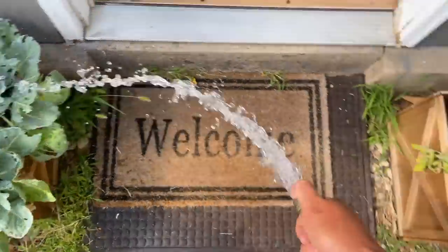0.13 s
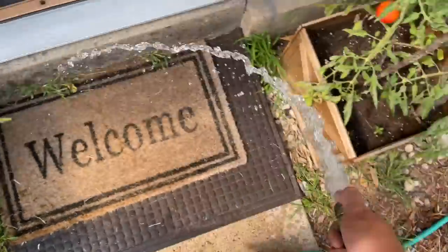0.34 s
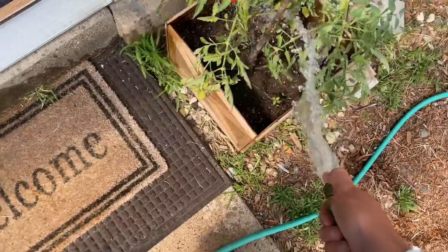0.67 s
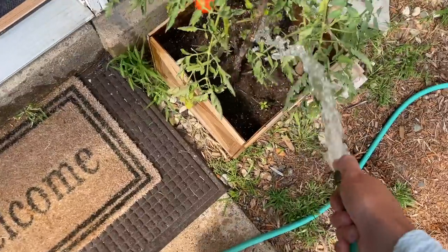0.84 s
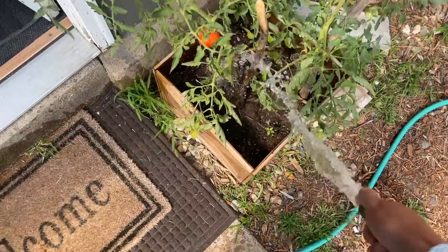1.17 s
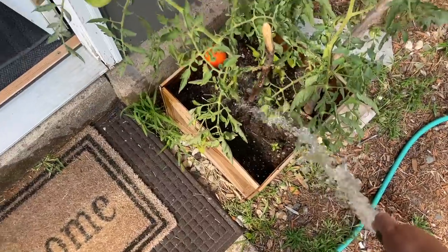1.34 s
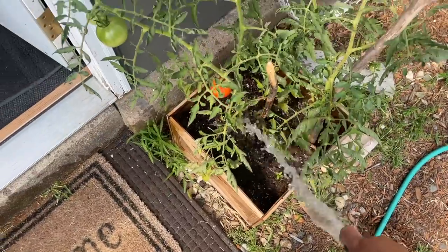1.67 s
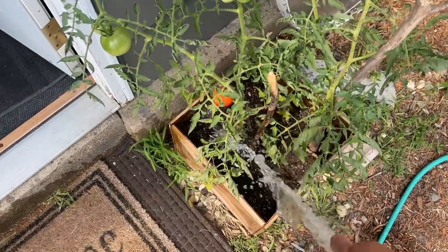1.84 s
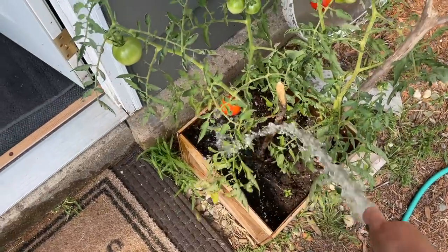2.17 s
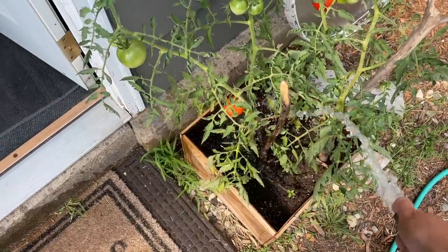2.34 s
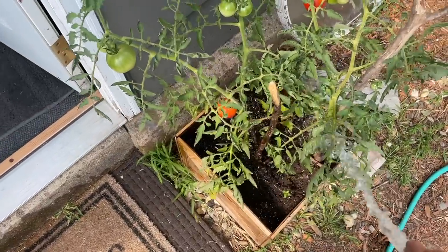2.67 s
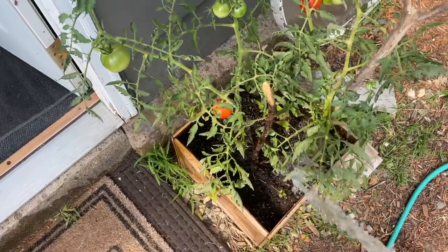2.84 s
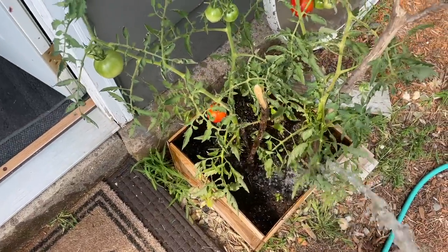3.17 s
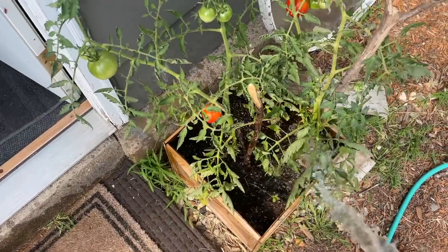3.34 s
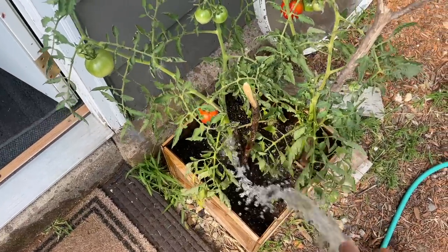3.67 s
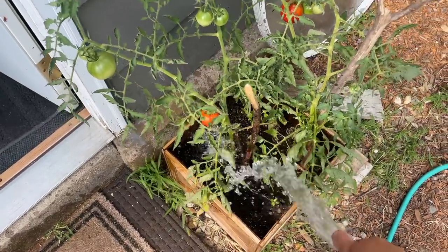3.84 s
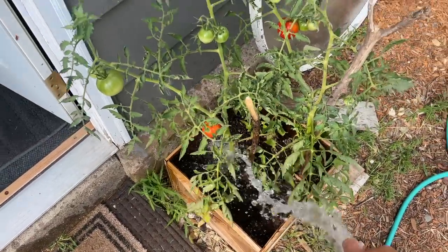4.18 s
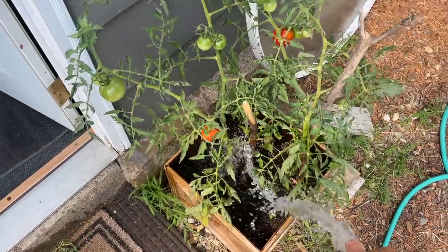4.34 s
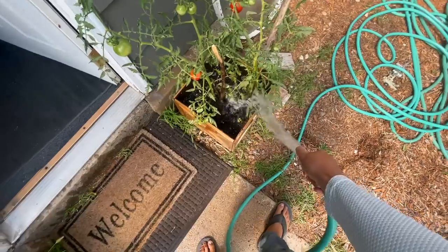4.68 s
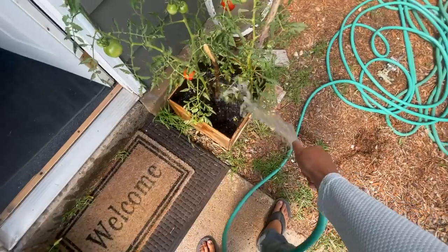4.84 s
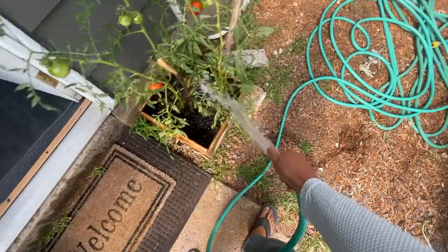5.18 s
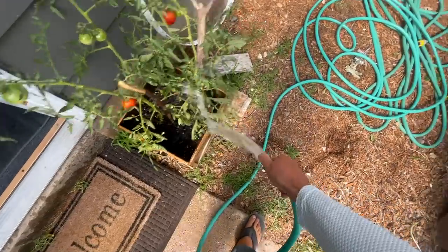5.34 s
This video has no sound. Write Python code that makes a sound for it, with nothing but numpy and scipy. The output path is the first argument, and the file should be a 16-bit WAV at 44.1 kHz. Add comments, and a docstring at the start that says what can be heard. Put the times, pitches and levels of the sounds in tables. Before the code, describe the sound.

Close, crackly water from a garden hose splashes on plants and soil, wooden box thumping underneath, then turning thinner and brighter near the end.

```python
"""A loose jet from a garden hose is swung over a wooden planter beside a house wall.
Its water patters and fizzes as random drops: short noise bursts, ringing cavities and trapped bubbles.
Larger slugs splat as noise around a rising tone, and the heavy ones thud on the soil.
Random hits drum the planter and stir a low rumble, over the steady shaped noise of the yard.
A hand-held pair of microphone ports hears it; near the end it is raised and turned."""
import sys
import numpy as np
from scipy import signal
from scipy.fft import rfft, irfft
from scipy.io import wavfile
from scipy.ndimage import uniform_filter1d

SR = 44100
rng = np.random.default_rng(int(sys.argv[2]) if len(sys.argv) > 2 else 0)


def unload_wav(signal):
    """Save mono or channel-first audio to the path in sys.argv[1] as 16-bit WAV at rate SR, clipped to [-1, 1]."""
    wavfile.write(
        sys.argv[1],
        SR,
        np.round(np.clip(np.atleast_2d(signal).T, -1, 1) * 32767).astype(np.int16),
    )


N = 242991


def from_db(db):
    """Turn decibels into a gain."""
    return 10 ** (np.asarray(db) / 20)


def rms_one(x):
    """Scale a sound to an average (rms) strength of 1."""
    return x / np.sqrt(np.mean(x ** 2) + 1e-20)


def in_time(rows):
    """Draw straight lines between table rows; give each column at every sample."""
    s, *columns = np.transpose(rows)
    return [np.interp(np.arange(N) / SR, s, c) for c in columns]


def at_hz(points):
    """Read a table of frequency and value at every bin of the spectrum."""
    hz = np.maximum(np.fft.rfftfreq(N, 1 / SR), 1)
    table_hz, values = np.array(points).T
    return np.interp(np.log(hz), np.log(table_hz), values)


def colour(x, spectrum, level_db):
    """Make each frequency of a sound louder or softer, as a table says."""
    gain = from_db(at_hz(spectrum))
    return from_db(level_db) * irfft(rfft(x) * gain, N)


def drift(rate_hz):
    """Smooth noise into a slow random wander of rms 1."""
    r = np.exp(-2 * np.pi * rate_hz / SR)
    noise = rng.standard_normal(N + SR)
    wander = signal.lfilter([1], [1, -2 * r, r * r], noise)
    return rms_one(wander[SR:])     # the first second lets the filter settle


def resonate(x, hz, width_hz):
    """Ring at one pitch like a struck cavity; a narrower resonance rings longer."""
    r = np.exp(-np.pi * width_hz / SR)
    feed = [(1 - r * r) / 2, 0, -(1 - r * r) / 2]     # gain 1 at the top of the resonance
    back = [1, -2 * r * np.cos(2 * np.pi * hz / SR), r * r]
    return signal.lfilter(feed, back, x + 1e-18)


def body(x, modes):
    """A solid body rings at several pitches at once; rms 1."""
    total = 0
    for k, (hz, width_hz, db) in enumerate(modes):
        total = total + (-1) ** k * from_db(db) * resonate(x, hz, width_hz)
    return rms_one(total)


def drops(per_s, spread_db, clump_db):
    """Drops of random strength hit at random moments, clumped as the jet breaks up."""
    sizes = from_db(spread_db * np.minimum(rng.exponential(1, N), 3.5))
    chance = per_s * from_db(clump_db * np.tanh(drift(30))) / SR
    return sizes * (rng.random(N) < chance)


def patter(lumps, pitches, per_s, spread_db, burst_s, cycles, lump_db, ring_db, hiss_db):
    """A drop fizzes briefly around its pitch and rings a cavity; a lump fizzes at all pitches."""
    tail = [1, -np.exp(-1 / (burst_s * SR))]
    hits = [drops(per_s, spread_db, clump_db=6.5) for _ in pitches]     # each pitch clusters on its own
    bursts = signal.lfilter([1], tail, hits)
    versions = []
    for _ in range(2):     # same hits, unrelated noise
        noise = rng.standard_normal((3, N))
        sign = rng.choice([-1, 0, 1], N)
        fizz = sum(resonate(b * noise[0], hz, hz / 3.6) for b, hz in zip(bursts, pitches))
        rings = sum(resonate(h * sign, hz, hz / cycles) for h, hz in zip(hits, pitches))
        broad = signal.lfilter([1], tail, lumps) * noise[1]
        mix = rms_one(fizz) + from_db(ring_db) * rms_one(rings)
        mix = mix + from_db(lump_db) * rms_one(broad) + from_db(hiss_db) * noise[2]
        versions.append(rms_one(mix))
    return np.array(versions)


def in_range(edges_hz, kind, slugs, patter_sound, level_db):
    """Keep one range of pitch; set the patter by its strength after the low-held sum colour."""
    sos = signal.butter(3, edges_hz, kind, fs=SR, output="sos")
    patter_sound = signal.sosfilt(sos, patter_sound)
    strength = np.std(colour(patter_sound[0], SUM_LOW, 0))
    return signal.sosfilt(sos, slugs) + from_db(level_db) * patter_sound / strength


# The jet breaking on the leaves, before the swell around slugs:
# [t/s, small drops level/dB, big drops level/dB, fine spray level/dB]
JET_LEVELS = [(0.0, -37, -53, -31.5), (0.1, -41, -48.5, -37.5), (0.13, -45, -51, -40.5),
              (0.25, -45.5, -56.5, -48), (0.33, -49, -52, -42), (0.35, -43.5, -59, -42),
              (0.49, -49, -55.5, -40.5), (0.6, -42.5, -48, -35), (0.68, -45, -48.5, -44),
              (0.78, -49.5, -48, -47), (0.84, -38, -44.5, -41), (0.89, -43, -44, -42),
              (1.0, -41.5, -45.5, -38.5), (1.12, -36.5, -38, -40.5), (1.21, -45.5, -46, -40),
              (1.43, -43, -50.5, -37.5), (1.52, -38.5, -49.5, -37), (1.63, -41.5, -48.5, -36.5),
              (1.74, -45.5, -48.5, -41), (1.82, -39.5, -42, -35.5), (2.05, -42.5, -49.5, -40),
              (2.29, -40, -45.5, -40), (2.34, -41, -46.5, -38), (2.39, -49, -53, -49),
              (2.46, -41.5, -43.5, -36), (2.52, -50, -50, -48), (2.65, -36, -40.5, -33.5),
              (2.72, -48, -58, -45), (2.88, -47.5, -49.5, -42.5), (3.05, -35.5, -46.5, -38),
              (3.25, -42.5, -51, -38.5), (3.54, -43.5, -50, -39.5), (3.65, -43.5, -47.5, -39),
              (3.8, -40, -46, -38), (3.97, -38.5, -44, -36), (4.0, -47.5, -48.5, -44),
              (4.05, -39.5, -46, -37), (4.24, -41, -43.5, -40), (4.5, -39.5, -44.5, -36.5),
              (4.62, -43, -55.5, -38), (4.79, -41, -50, -36.5), (4.99, -41, -51.5, -37),
              (5.22, -41, -48, -34.5), (5.4, -41.5, -47, -39), (5.51, -42.5, -43, -38)]
SMALL_FROM_HZ, SPRAY_FROM_HZ = 2750, 6660     # big drops lie below, fine spray above
SPRAY_FOLLOWS = 0.71     # share of the swell that the fine spray follows
BUBBLE_DB, NOZZLE_HISS_DB = -8.5, -54     # bubbles against the patter; hiss before port colour


def jet_water():
    """Drops in three ranges of pitch, partly struck by the same lumps, plus slugs and nozzle hiss."""
    small_db, big_db, spray_db = in_time(JET_LEVELS)
    swell_db = slug_swell_db()
    low, high, tone = splats(ring_db=-10.5, spray_db=8.0, broad_db=-4.0)
    surge = from_db(4 * np.tanh(drift(7)))     # the jet surges
    lumps = drops(per_s=250, spread_db=4.5, clump_db=4.0) * surge
    leaves = patter(lumps, np.geomspace(1000, 8500, 13), per_s=55, spread_db=-1.0, burst_s=0.007,
                    cycles=14, lump_db=4, ring_db=-3, hiss_db=-3)
    leaves = rms_one(leaves + from_db(BUBBLE_DB) * bubbles())
    spray = patter(lumps, np.geomspace(10000, 15000, 3), per_s=620, spread_db=6.5, burst_s=0.0057,
                   cycles=7.0, lump_db=-4, ring_db=-5, hiss_db=-12)
    white = in_range(SMALL_FROM_HZ, "low", low, leaves, big_db + swell_db)
    white += in_range([SMALL_FROM_HZ, SPRAY_FROM_HZ], "band", low, leaves, small_db + swell_db)
    white += in_range(SPRAY_FROM_HZ, "high", high, spray, spray_db + SPRAY_FOLLOWS * swell_db)
    white += from_db(NOZZLE_HISS_DB) * rng.standard_normal((2, N))     # the jet leaving the hose
    return heard_at_ports(white) + tone * from_db([[1.5], [-1.5]])     # slug tones sit a little left


BUBBLES_PER_S, BUBBLE_CYCLES = 420, 48     # cycles to fall by 60 dB
BUBBLE_RISE = 0.004     # rise per cycle, as a share of the starting pitch


def bubbles():
    """Drops trap air that rings briefly, rising in pitch; each bubble sits at its own side."""
    out, t = np.zeros((2, N + 1500)), np.arange(1500) / SR
    for at, size, softness, side in rng.random((int(BUBBLES_PER_S * N / SR), 4)):
        hz, i = 1100 * 6.5 ** size, int(at * N)
        cycle = hz * t
        wave = np.sin(2 * np.pi * cycle * (1 + BUBBLE_RISE * cycle / 2))
        ring = wave * from_db(-60 * cycle / BUBBLE_CYCLES - 12 * softness)
        ring *= np.minimum(cycle / 4.1, 1) * np.sqrt(hz)     # swells in over 4.1 cycles
        out[:, i:i + len(t)] += ring * [[1], [2 * side - 1]]     # rows: sum and difference
    return rms_one(out[:, :N])


def ports(white, sum_colour, diff_colour, sum_db, diff_db, lean, quarter):
    """Two spaced ports as sum and difference; the difference partly follows the sum."""
    share = np.clip(at_hz(lean), -.75, .75) + 1j * quarter
    a, b = rfft(white)
    diff = irfft(share * a + np.sqrt(1 - abs(share) ** 2) * b, N)
    mid = colour(white[0], sum_colour, sum_db)
    side = colour(diff, diff_colour, diff_db)
    return np.array([mid + side, mid - side])


# Colour of the water in the ports' sum and difference, held low then raised,
# before the overall levels below: [f/Hz, level/dB per Hz]
SUM_LOW = [(290, 8.5), (500, 5.5), (727, -3.5), (1270, -4), (1540, 0), (1930, 3), (2470, 1), (2850, 0),
           (4460, 2), (5610, -2.5), (6970, 3), (9160, -16), (10900, -3.5), (13700, 0.5), (15600, 0)]
DIFF_LOW = [(290, -50), (500, -5), (639, -1), (696, -2), (1290, -7.5), (1880, 3.5), (2110, -4.5),
            (3300, 2.5), (4210, -3.5), (5150, 3), (6580, 3.5), (8400, 6.5), (11700, -1.5), (13300, -24),
            (15600, -24)]
SUM_RAISED = [(290, -52), (500, -43), (889, -3.5), (1190, -1.5), (1350, -6), (1830, 8), (2200, 0),
              (3340, -3), (3700, -5.5), (6030, 3.5), (7490, -0.5), (9290, -4), (10700, -19), (13500, -3),
              (15600, -7)]
DIFF_RAISED = [(290, -57), (500, -32), (816, -15), (889, -10), (1090, -7), (1370, -10), (1830, 0.5),
               (2110, -6), (3860, -8.5), (5530, -1), (6030, 2), (7490, -7), (8050, -10), (9030, -4.5),
               (15600, -43)]
# How much the difference follows the sum, pulling water left; capped at 0.75: [f/Hz, share]
LEAN_LOW = [(500, 0.6), (2000, 0.26), (5000, 0.056), (9000, .01), (15000, .01)]
LEAN_RAISED = [(500, 1), (2000, 0.28), (6000, 0.52), (9000, 0.064), (15000, .01)]
DIFF_LOW_DB, SUM_RAISED_DB, DIFF_RAISED_DB = -3, 1.5, 6.5
QUARTER_LOW, QUARTER_RAISED = 0.34, 0.28     # share that follows a quarter cycle early
RAISED_AT_S, RAISE_S = 4.45, 0.0091     # middle and length of the crossfade


def heard_at_ports(white):
    """Raising and turning the ports changes colour and side: one hearing fades into another."""
    raised = np.clip((np.arange(N) / SR - RAISED_AT_S) / RAISE_S + .5, 0, 1)
    held_low = ports(white, SUM_LOW, DIFF_LOW, 0, DIFF_LOW_DB, LEAN_LOW, QUARTER_LOW)
    held_high = ports(white, SUM_RAISED, DIFF_RAISED, SUM_RAISED_DB, DIFF_RAISED_DB,
                      LEAN_RAISED, QUARTER_RAISED)
    return (1 - raised) * held_low + raised * held_high


def jet_pounding():
    """Random hits on the planter: three rows share their moments but push in or out by chance."""
    return drops(per_s=130, spread_db=-2.0, clump_db=3.0) * rng.choice([-1, 1], (3, N))


# Ringing of the planter, passed through twice: [f/Hz, width/Hz, level/dB]
PLANTER_MODES = [(179, 64, 1.3), (329, 71, 2), (419, 154, -2.5), (567, 137, -11)]
# The jet reaching soil and boards, before random surges:
# [t/s, planter drumming level/dB, low rumble level/dB]
GROUND_LEVELS = [(0.0, -55, -58), (0.56, -65, -59.5), (0.58, -33.5, -68), (0.64, -42, -49),
                 (0.73, -46, -53), (0.88, -39.5, -41), (0.9, -44, -66), (1.25, -42.5, -38),
                 (1.32, -47, -49), (1.6, -49.5, -59), (2.0, -44.5, -50), (2.36, -42, -43), (2.4, -56, -56),
                 (2.66, -43, -48), (2.73, -55, -52.5), (3.07, -45, -43), (3.15, -40.5, -34.5),
                 (3.21, -55, -50), (3.6, -47, -47.5), (3.84, -46.5, -55), (3.9, -37.5, -44),
                 (4.0, -43, -46), (4.13, -43, -43.5), (4.44, -60, -50.5), (4.48, -54, -68),
                 (4.8, -58.5, -65), (5.22, -62, -61), (5.26, -47.5, -55), (5.51, -56.5, -66)]
DRUM_SURGE_DB, RUMBLE_SURGE_DB, GROUND_SURGES_HZ = 3.5, 4, 9.4


def planter_drumming(hits):
    """The hits ring the planter's resonances, and the wall sends back a faint echo."""
    level_db = in_time(GROUND_LEVELS)[0] + DRUM_SURGE_DB * np.tanh(drift(GROUND_SURGES_HZ))
    drum = from_db(level_db) * body(body(hits, PLANTER_MODES), PLANTER_MODES)
    echo = 0.12 * np.roll(drum, 300)     # 300 samples late
    return drum + echo * [[1], [-1]]     # the echo differs at the ports


# Low resonances of the rumble, passed through twice: [f/Hz, width/Hz, level/dB]
RUMBLE_MODES = [(41, 28, -5), (64.2, 33.3, -1.5), (108.2, 44, -4)]


def low_rumble(hits):
    """Two rows of hits ring low resonances; the second row differs between the ports."""
    level_db = in_time(GROUND_LEVELS)[1] + RUMBLE_SURGE_DB * np.tanh(drift(GROUND_SURGES_HZ))
    rows = from_db(level_db) * np.array([body(body(h, RUMBLE_MODES), RUMBLE_MODES) for h in hits])
    return rows[0] + .5 * rows[1] * [[1], [-1]]


# Colour of the yard's background, before it is scaled to rms 1: [f/Hz, level/dB per Hz]
YARD_COLOUR = [(35, -38), (60, 4), (129, 1), (189, 6), (247, 3), (434, 5), (735, 2), (1500, -4),
               (1950, -48), (3300, -120)]
YARD_DB = -55.5     # of the part shared by both ports


def yard():
    """Steady noise, mostly low, partly shared between the ports."""
    noise = rng.standard_normal((2, N))
    rows = np.array([rms_one(colour(n, YARD_COLOUR, 0)) for n in noise])
    return from_db(YARD_DB) * (rows[0] + 0.8 * rows[1] * [[1], [-1]])


# Slugs of water landing; levels before the ports' colour and the gains passed to splats():
# [t/s, reference level/dB, cavity pitch f/Hz,
#  fine spray level/dB above reference, splash level/dB above reference]
SLUGS = sorted([(0.0222, -21.5, 5640, -12, -2.5), (0.1457, -18, 4100, -27, -12),
         (0.303, -27.5, 3930, -2, -5), (0.5182, -19.5, 4970, -0.5, -7.5), (0.5155, -22.5, 1360, -10, -27),
         (0.5672, -20.5, 1640, -10, -11), (0.5906, -27.5, 1660, 5, -5), (0.6146, -15.5, 1580, -10, -11.5),
         (0.6377, -23.5, 3440, 1, -2.5), (0.8137, -21.5, 4770, -2, -1), (0.8315, -14.5, 4960, -26, -7),
         (0.845, -11, 4600, -25, -15), (0.9083, -20, 6000, -9, -21), (0.9262, -23.5, 1370, 1, -13),
         (0.975, -23, 5550, -5, -1.5), (1.014, -24, 1480, -2, -10), (1.04, -20.5, 4700, -19, -6),
         (1.067, -19, 4540, -30, -4.5), (1.1075, -22, 1440, -27, -10), (1.1525, -18.5, 6460, -9.5, -8),
         (1.279, -28.5, 3030, -10, -2), (1.4202, -35, 6880, 6.5, -13), (1.4418, -42, 5930, -8, -12),
         (1.4687, -24, 4200, -22, -22), (1.493, -22.5, 3230, 6.5, -6), (1.5284, -28, 4340, -9, 2),
         (1.5444, -19, 3540, -0.5, -2.5), (1.6182, -24, 6960, -8, -2), (1.6482, -25.5, 2450, -11, -0.5),
         (1.7853, -23, 1850, 1, -11), (1.958, -35, 6560, 4, -13), (1.9704, -25, 2620, 6, -2),
         (1.9946, -22.5, 2750, -4, -3), (2.1275, -28, 2280, -9, -4), (2.1843, -22, 3800, -31, -1.5),
         (2.2621, -19.5, 3720, 0.5, -8), (2.3068, -18, 1900, -15, -23), (2.3236, -8, 3650, -31, -23),
         (2.4421, -24.5, 3560, -5, -4), (2.4818, -21, 2270, -2.5, -10.5), (2.5408, -13.5, 5060, -13, -9),
         (2.584, -19, 3080, -8, -8.5), (2.6167, -27, 4640, -1, 0), (2.6403, -15.5, 3320, -13, -6.5),
         (2.679, -17, 4850, -23, -24), (2.7003, -16.5, 4700, -11, -29), (2.9355, -25, 4500, -4, -12),
         (3.0045, -16, 4320, -5.5, -10), (3.0376, -18.5, 4270, -8, -1.5), (3.1428, -19.5, 4400, -1.5, -11),
         (3.2088, -21, 6800, -0.5, -6), (3.4123, -21, 5000, -24, -25), (3.592, -23.5, 2310, -4, -4.5),
         (3.6654, -26.5, 2100, -13, -8), (3.687, -9.5, 2310, -21, -14.5), (3.7713, -21.5, 4440, -13, -2.5),
         (3.7932, -24.5, 2560, -17, -2), (3.881, -19.5, 1800, -5, -4.5), (3.9312, -22, 3750, -10, -3),
         (4.016, -20.5, 6930, -2.5, -6), (4.147, -25, 4300, 5, -3), (4.1849, -10.5, 2200, -32, -31),
         (4.2168, -25, 3140, 1, -3), (4.2566, -10, 1940, -34, -40), (4.332, -20, 3840, -8, -8),
         (4.373, -23.5, 2420, 3, -12), (4.395, -18, 2470, -21, -13), (4.4358, -23.5, 6350, 0.5, -13),
         (4.562, -18, 1860, -4, -10.5), (4.5802, -8.5, 6540, -15, -17), (4.6474, -6.5, 6270, -28, -17),
         (4.7705, -26, 6600, 2, -5), (4.8338, -26, 6060, -25, -1), (4.9455, -22, 6340, -1, -24),
         (5.0111, -13, 6050, -20, -12.5), (5.0514, -17.5, 6000, -11, -16), (5.0624, -25, 5860, -4, -30),
         (5.1543, -19, 5740, -9, -4), (5.241, -28, 5630, -13, -1.5), (0.5741, -31, 6500, -6, -1),
         (1.499, -25, 6500, 7, -16), (2.3098, -28.5, 3760, 0, 0), (2.3305, -22.5, 3960, -3, -7),
         (2.1345, -18.5, 3380, -9.5, -17), (2.139, -15, 2060, -17, -14), (2.067, -28, 3000, -6, -7),
         (1.988, -26, 2060, -19, -8), (4.768, -21, 3260, -20, -20), (4.864, -25.5, 1160, -20, -20),
         (4.923, -22, 1850, -20, -17), (0.2099, -26, 2640, -25, -12), (0.3122, -31, 4380, -17, -4),
         (0.3546, -34, 2320, -12, -1), (0.6474, -19.5, 3560, -2, -9), (0.7038, -31.5, 6200, -14, -3),
         (0.7287, -30.5, 4700, -5, -1), (1.0236, -17.5, 1500, -16, -11), (1.0864, -22, 4830, -23, -5),
         (1.1842, -31, 6360, -8, -10), (1.3229, -26, 6300, -15, -5), (1.3414, -25.5, 5900, 0.5, -2),
         (1.4052, -27, 6540, -10, 0), (1.4541, -21, 4150, -2, -11), (1.7619, -24, 6420, -12, -11),
         (1.8178, -19.5, 7000, -21, -6), (1.8622, -25, 6700, -9, -8), (1.923, -22, 6650, -6, -19),
         (2.0946, -31, 3300, -10, -13), (2.4954, -18, 4840, -6, -8.5), (2.5334, -17, 2980, -23, -8.5),
         (2.5601, -20, 6100, -3.5, -21), (2.9582, -23, 6840, -17, -5), (2.9682, -29, 2320, -14, -6),
         (3.0914, -16, 6930, -13, -13), (3.2964, -23, 6100, -22, -14), (3.3533, -19, 4950, -18, -15),
         (3.4436, -27.5, 6330, -3, -5), (3.4875, -26.5, 5270, 0, -8), (3.5513, -18.5, 6650, -8, -11.5),
         (3.6042, -26.5, 4270, -6, -2.5), (3.7354, -23.5, 3470, -3, -10), (3.9644, -27, 2150, -16, -2),
         (4.0238, -29, 4020, -6, 0), (4.0781, -32, 4340, -19, -11), (4.3106, -18, 4040, -16, -13),
         (4.4887, -25, 1800, -7, -4), (4.5366, -30, 6040, -18, -10), (4.6604, -22, 6440, -20, -6),
         (4.7247, -16, 6440, -14, -18), (4.8574, -25.5, 6400, -18, -2), (4.9554, -18, 2930, -26, -25),
         (5.0024, -18, 6000, -17, -8), (5.1841, -27, 5550, -10, -3), (5.3363, -34, 5850, -13, -3),
         (5.4101, -31, 1800, -3, -8)])
# fall by 60 dB at 4 kHz; lower-pitched cavities last longer
SPLAT_T60_S, SPLAT_PITCH_LAW, SPLAT_RISE_S = 0.008, 0.4, 0.0005
RING_ON_DB, RING_ON_CYCLES = -11, 60     # the faint ring after: start level, cycles to fall 60 dB
CRACKLE_DB, CRACKLE_T60_S = -13, 0.2     # thrown-up droplets; a window shortens them further
SPRAY_RISE_S, SPRAY_T60_S = 0.0002, 0.007     # fine spray snaps on and dies fast


def splats(ring_db, spray_db, broad_db):
    """A slug bursts into noise, strongest near the pitch of the cavity it punches, which rings and rises."""
    low, high, tone = np.zeros((2, N)), np.zeros((2, N)), np.zeros(N)
    t = np.arange(1400) / SR
    fade_out = np.hanning(2 * len(t))[len(t):]
    for s, db, hz, fine_db, splash_db in SLUGS:
        t60 = SPLAT_T60_S * (4000 / hz) ** SPLAT_PITCH_LAW
        i = round(s * SR)
        n = min(len(t), N - i)
        fade = (1 - np.exp(-t / SPLAT_RISE_S)) ** 2 * from_db(-60 * t / t60)
        fade = from_db(db) * fade / fade.max()
        # thrown-up droplets land again as an uneven crackle
        landings = 1.0 * (rng.random(len(t)) < 350 / SR)
        crackle = uniform_filter1d(landings, size=40) * 40
        after = from_db(db + CRACKLE_DB - 60 * t / CRACKLE_T60_S) * crackle
        after = after * fade_out * np.minimum(t / 0.0024, 1)
        mist = (1 - np.exp(-t / SPRAY_RISE_S)) * from_db(db - 60 * t / SPRAY_T60_S)
        noise = rng.standard_normal((2, 2, len(t))) * [[fade + after], [mist + after]]
        splash = 2 * resonate(noise[0], hz, 0.21 * hz) + from_db(broad_db) * noise[0]
        # give the splash the energy of its envelope
        splash *= np.sqrt(np.sum((fade + after) ** 2) / np.sum(splash ** 2, axis=1, keepdims=True))
        ring_on = from_db(db + RING_ON_DB - 60 * t * hz / RING_ON_CYCLES) * np.minimum(t / 0.0039, 1)
        ring = from_db(ring_db) * (fade + ring_on) * np.sin(2 * np.pi * hz * (t + 3.5 * t * t))
        low[:, i:i + n] += from_db(splash_db) * splash[:, :n]
        high[:, i:i + n] += from_db(spray_db + fine_db) * noise[1, :, :n]
        tone[i:i + n] += ring[:n]
    return low, high, tone


BEFORE_S, AFTER_S, ESCORT_DB = 0.005, 0.016, 8     # spreads of the swell; gain over slug level


def slug_swell_db():
    """Drops swell just before each slug and longer after it, more for a louder slug."""
    s, db = np.transpose(SLUGS)[:2]
    marks = np.zeros(N)
    marks[(s * SR).astype(int)] = from_db(db + ESCORT_DB)
    t = np.arange(-2000, 2001) / SR
    bell = np.exp(-.5 * (t / np.where(t < 0, BEFORE_S, AFTER_S)) ** 2)
    swell = 20 * np.log10(1 + np.abs(signal.fftconvolve(marks, bell, "same")))
    return swell - swell.mean()     # averages to no change in dB


# Heavy slugs on the soil: [t/s, peak level/dB, pitch f/Hz]
HEAVY_SLUGS = sorted([(0.576, -29.5, 323), (0.615, -22.5, 310), (0.642, -24, 220), (0.704, -34.5, 185),
               (0.814, -26, 385), (0.918, -39, 197), (1.076, -31.5, 316), (1.107, -28.5, 373),
               (1.163, -30, 160), (1.218, -31.5, 173), (1.28, -32, 303), (1.868, -31, 353),
               (1.961, -32.5, 173), (2.176, -31.5, 190), (2.252, -28.5, 350), (2.33, -32, 278),
               (2.623, -35, 302), (3.013, -31.5, 174), (3.047, -30, 180), (3.123, -23.5, 68.4),
               (3.593, -33, 178), (3.889, -27, 240), (3.925, -29, 195), (4.024, -28, 272), (4.11, -24, 333),
               (4.149, -28.5, 298), (4.19, -34, 170), (4.234, -27, 288), (3.775, -33, 298),
               (3.865, -32, 253), (3.955, -30.5, 303), (1.473, -33.5, 190), (1.542, -35.5, 176),
               (1.619, -41, 355), (1.7, -36, 188), (1.807, -32.5, 167), (2.17, -36, 53), (2.539, -33, 326),
               (2.916, -32, 54.3), (2.953, -36.5, 332), (3.229, -32, 91), (4.434, -40, 296)])


def thuds(cycles):
    """A heavy slug pushes the soil and the boards, which swing briefly and settle."""
    out, t = np.zeros(N), np.arange(4000) / SR
    for s, db, hz in HEAVY_SLUGS:
        i = round(s * SR)
        push = t * np.exp(-t * hz / cycles) * np.sin(2 * np.pi * hz * t)
        out[i:i + len(t)] += from_db(db) * push / abs(push).max()
    return out


def scene():
    """Water above, planter, soil and yard below."""
    hits = jet_pounding()
    ground = planter_drumming(hits[0]) + low_rumble(hits[1:])
    return jet_water() + ground + yard() + thuds(cycles=0.91)


def record(dry):
    """Cut the lowest bass below 32 Hz and the top near 16.1 kHz."""
    dry = signal.sosfilt(signal.butter(4, 32, "high", fs=SR, output="sos"), dry)
    return signal.sosfilt(signal.cheby2(12, 60, 16100, fs=SR, output="sos"), dry)


dry = scene()
out = record(dry)
unload_wav(out)
```